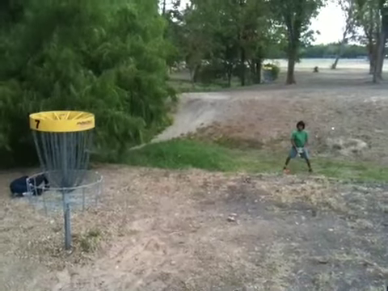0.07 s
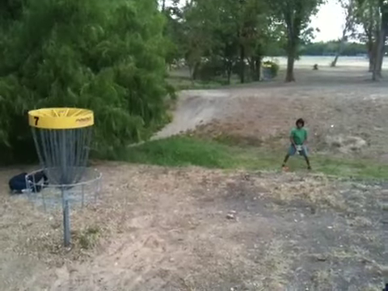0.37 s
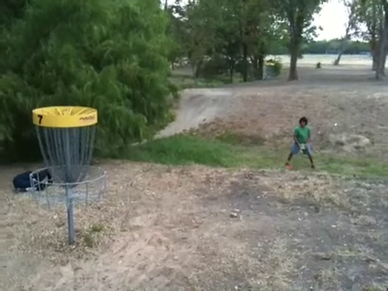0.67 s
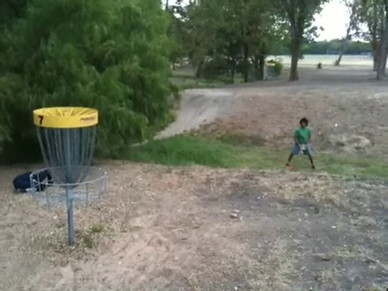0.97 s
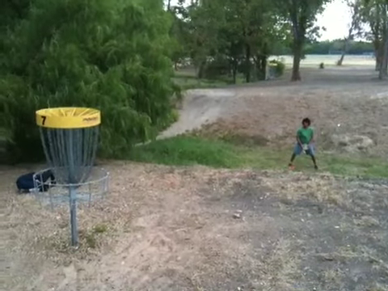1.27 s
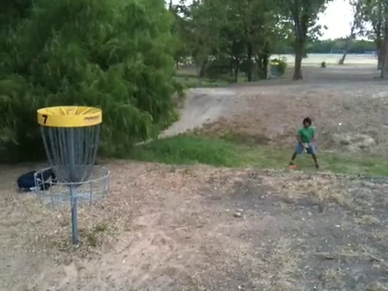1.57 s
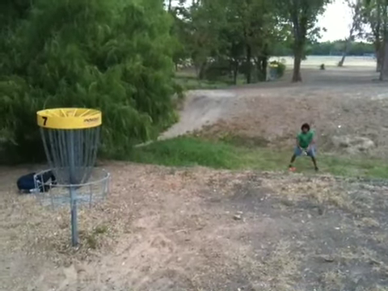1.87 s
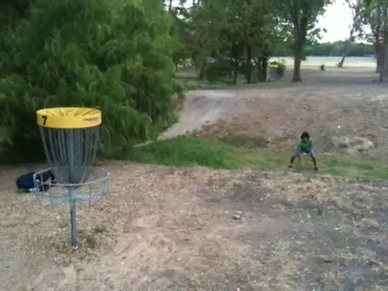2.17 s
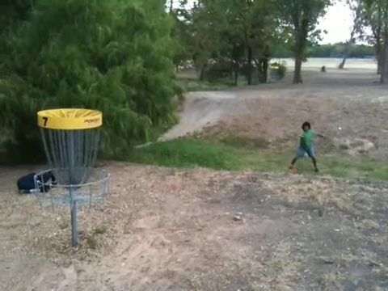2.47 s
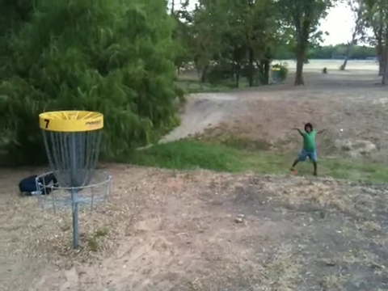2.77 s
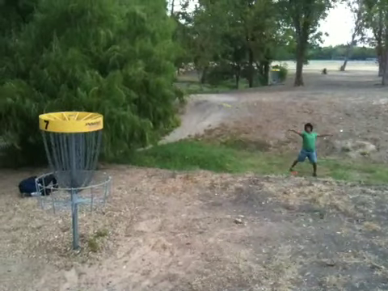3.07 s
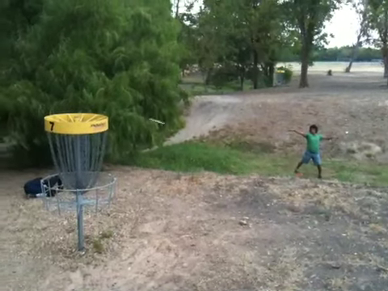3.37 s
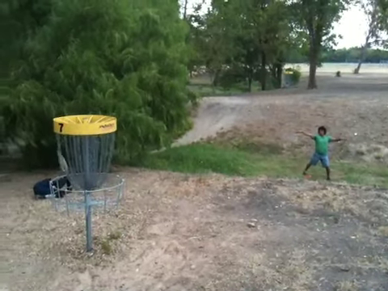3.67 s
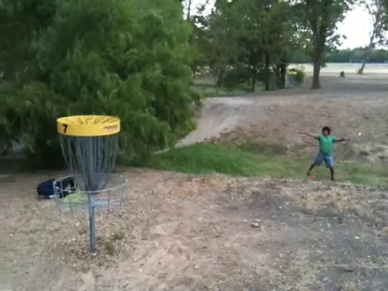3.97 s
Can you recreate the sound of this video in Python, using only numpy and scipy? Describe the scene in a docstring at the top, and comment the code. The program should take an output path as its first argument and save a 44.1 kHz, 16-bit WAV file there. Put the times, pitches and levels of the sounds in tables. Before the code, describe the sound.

A thrown disc crashes into a chain basket near the end. First, outdoor wind rumbles on the microphone for half a second, drops, then returns in uneven gusts from about 1.5 seconds over a faint hush. At 3.7 seconds the plastic knocks into the chains with a loud, bright metallic clatter; the steel basket rings and the swinging links keep jingling until the end, around 4 seconds.

```python
"""Disc into chains, light wind

Outdoors, wind buffets the microphone over a distant hush, a thin whine and two faint whistles.
Near the end a thrown plastic disc slams into the hanging chains of a steel basket:
the plastic knocks, the chains clatter, spokes, frame and rim ring, the swinging links jingle on."""
import sys
import numpy as np
from scipy import signal
from scipy.fft import rfft, irfft
from scipy.io import wavfile
from scipy.ndimage import uniform_filter1d

SR = 44100
rng = np.random.default_rng(int(sys.argv[2]) if len(sys.argv) > 2 else 0)


def to_wav(sig):
    """Store sig (one row per channel, or 1-D mono) as 16-bit WAV at the path in sys.argv[1].

    Samples outside -1..1 are clipped; the rate is SR.
    """
    pcm = np.clip(np.atleast_2d(sig), -1, 1) * 32767
    pcm = np.round(pcm).astype(np.int16)
    wavfile.write(sys.argv[1], SR, pcm.T)  # frames by channels


N = 176400
T = np.arange(N) / SR

# wind strength: time_s, level_db
WIND_CURVE = [(0, -35), (.046, -25), (.075, -22.5), (.135, -31.5), (.18, -26), (.3, -22), (.33, -27),
              (.495, -33), (.53, -48.5), (.78, -52), (1.05, -42.5), (1.28, -55.5), (1.6, -36), (1.655, -41),
              (1.745, -31), (1.91, -45), (2.11, -29.5), (2.3, -40.5), (2.56, -43), (2.76, -37.5),
              (3.0, -35), (3.11, -38.5), (3.22, -32.5), (3.47, -34.5), (3.62, -44), (3.69, -29.5),
              (3.8, -27), (3.86, -43)]
# single buffets: start_s, relative_db
BUFFETS = [(0.204, -15.5), (0.285, -14), (0.59, -29.5), (0.87, -29), (1.177, -25.5), (1.319, -25.5),
           (1.358, -25), (1.564, -23.5), (1.687, -16), (2.029, -21), (2.183, -21.5), (3.021, -17.5),
           (3.157, -20), (3.194, -25.5), (3.25, -21.5), (3.436, -26.5), (3.546, -19)]
# wind rumble: freq_hz, density_db
RUMBLE_SPECTRUM = [(30, -66), (70, -17), (110, -3), (155, 2.5), (240, -4), (350, -13), (550, -27),
                   (1000, -47.5), (2500, -80.5)]
# flutter of strong gusts: freq_hz, density_db
FLUTTER_SPECTRUM = [(150, -32), (260, 2), (400, 6), (620, -2.5), (1500, -28), (2500, -43.5), (5000, -85)]
# still air, far surroundings: freq_hz, density_db
HUSH_SPECTRUM = [(50, -8), (150, 0), (500, 1), (1100, 4.5), (2000, -6), (3000, -9), (4400, -8), (6300, -13)]
# sharpest eddies: centre_s, level_db, pitch_hz, half_width_s
SLAPS = [(0.2922, -41, 464, 0.00098), (0.868, -26, 330, 0.0029), (1.6932, -15.5, 362, 0.0016)]
# rising whistles: start_s, pitch_hz, level_db
WHISTLES = [(2.811, 1840, -75), (2.87, 2420, -76)]
# disc blows on the chains: start_s, level_db, fall_s
BLOWS = [(3.7064, -21, 0.015), (3.723, -14.5, 0.0053), (3.75, -18, 0.013), (3.793, -25.5, 0.018),
         (3.9925, -32.5, 0.018)]
# dry link clatter: freq_hz, density_db
CLATTER_SPECTRUM = [(500, -24), (1200, -10), (2400, -5), (4300, 7), (5400, 6.5), (6600, -1.5), (8200, 7),
                    (10000, 5), (12000, 3), (14200, 9), (15200, -9)]
# plastic knock: freq_hz, density_db
KNOCK_SPECTRUM = [(150, -25), (800, 10), (1100, -1.5), (2400, 4.5), (3500, -22), (7000, -3.5)]
# jostling of the swinging chains: time_s, relative_db
SWING_CURVE = [(3.706, -14), (3.75, 3), (3.82, 0), (3.87, -5.5), (3.93, -9.5), (4.0, -8.5)]
# link modes: pitch_hz, spread_hz
LINK_MODES = [(4080, 150), (8850, 170), (11050, 150), (11600, 90), (11950, 130), (12640, 85), (13540, 120)]
# ring of each link mode: relative_db, t60_s
LINK_RING = [(-21, 0.073), (-19.5, 0.21), (-16, 0.2), (-1, 0.24), (-12, 0.12), (-5.5, 0.075), (-12, 0.15)]
# chain hits on spokes: start_s, level_db, pitch_hz, overtone_db
SPOKE_HITS = [(3.721, -39, 4080, 19.5), (3.7461, -19.5, 4090, 2), (3.763, -18, 3870, -15),
              (3.773, -23.5, 3885, -20), (3.797, -26.5, 3970, -22), (3.851, -30.5, 3912, -29)]
# steel frame modes: pitch_hz, level_db
FRAME_MODES = [(5620, -42), (7994, -52), (9157, -54), (11009, -31), (11714, -21.5), (12678, -37)]
# link-on-link clashes: start_s, level_db
CLASHES = [(3.7245, -19), (3.748, -24), (3.757, -23), (3.771, -12), (3.809, -22), (3.848, -37), (3.86, -22),
           (3.906, -37), (3.9605, -20.5), (3.981, -25), (3.995, -27)]


def from_db(db):
    """Decibels to gain."""
    return 10 ** (np.asarray(db) / 20)


def unit_rms(x):
    """Scale to unit power."""
    return x / np.sqrt(np.mean(x ** 2) + 1e-20)


def gain_curve(rows):
    """Gain along time_s, level_db rows."""
    time_s, level_db = np.transpose(rows)
    return from_db(np.interp(T, time_s, level_db))


def colour(x, spectrum):
    """Shape x by a smooth spectrum; unit power."""
    hz, db = np.transpose(spectrum)
    bins_hz = np.maximum(np.arange(N // 2 + 1) * SR / N, 1)
    gain = from_db(np.interp(np.log(bins_hz), np.log(hz), db))
    return unit_rms(irfft(rfft(x) * gain, N))


def noise(spectrum):
    """Coloured noise; unit power."""
    return colour(rng.standard_normal(N), spectrum)


def drift(corner_hz):
    """Random wander; unit power."""
    bins_hz = np.arange(N // 2 + 1) * SR / N
    return unit_rms(irfft(rfft(rng.standard_normal(N)) / (1 + (bins_hz / corner_hz) ** 2), N))


def steady(x, samples):
    """Even out the level over a sliding window."""
    return x / np.sqrt(np.abs(uniform_filter1d(x ** 2, samples)) + 1e-9)


def swell(start_s, rise_s, fall_s):
    """Linear rise, exponential fall."""
    age_s = np.maximum(T - start_s, 0)
    return np.minimum(age_s / rise_s, 1) * np.exp(-np.maximum(age_s - rise_s, 0) / fall_s)


def contacts(rate_per_s, uneven_db):
    """Random clicks of uneven size."""
    size = from_db(uneven_db * np.minimum(rng.exponential(1, N), 3)) * rng.choice([-1, 1], N)
    return size * (rng.random(N) < rate_per_s / SR)


def ring(clicks, hz, t60_s):
    """Resonator: a unit click starts a decaying unit sine."""
    radius, angle = np.exp(-np.log(1000) / (t60_s * SR)), 2 * np.pi * hz / SR
    return signal.lfilter([0, np.sin(angle)], [1, -2 * radius * np.cos(angle), radius ** 2], clicks + 1e-18)


def ping(start_s, hz, rise_s, t60_s):
    """One mode struck by a brief rattling contact; random phase."""
    out, start = np.zeros(N), min(int(start_s * SR), N - 1)
    age_s = T[:min(N - start, SR // 2)]
    envelope = (1 - np.exp(-age_s / rise_s)) * np.exp(-np.log(1000) * age_s / t60_s)
    out[start:start + len(age_s)] = envelope * np.sin(2 * np.pi * (hz * age_s + rng.random()))
    return out


def puffs(level, rate_per_s=24, fall_s=0.018, steady_above_db=-29.5):
    """Chance puffs roughen weak wind and merge into steady flow as it grows."""
    times_s = np.cumsum(rng.uniform(.35, 1.65, 160)) / rate_per_s
    kicks = np.zeros(N)
    kicks[(times_s[times_s < T[-1]] * SR).astype(int)] = 1
    decays = signal.lfilter([1], [1, -np.exp(-1 / (fall_s * SR))], kicks)
    train = unit_rms(uniform_filter1d(decays, size=130))
    share = 0.6 / (1 + (level / from_db(steady_above_db)) ** 4)
    return level * (1 - share + share * train)


def wind(ceiling_db=-20.5, strong_gust_db=-25, flutter_db=-34):
    """Eddies rumble on the microphone; strong gusts level off and flutter brighter."""
    flow = puffs(gain_curve(WIND_CURVE))
    buffet_power = sum((from_db(db - 7) * swell(start_s, rise_s=0.00258, fall_s=0.025)) ** 2
                       for start_s, db in BUFFETS)
    force = np.sqrt(flow ** 2 + buffet_power)
    rumble_gain = force / np.hypot(1, force / from_db(ceiling_db))
    flutter_gain = from_db(flutter_db) * (force / from_db(strong_gust_db)) ** 2.16
    flutter = steady(noise(FLUTTER_SPECTRUM) * from_db(4.9 * drift(corner_hz=110)), samples=900)
    rumble = steady(noise(RUMBLE_SPECTRUM), samples=1100)
    return rumble_gain * rumble + flutter_gain * flutter


def whine(pitch_hz=4435, waver_hz=10.9, level_db=-79):
    """Thin, steady tone, perhaps a far insect."""
    phase = 2 * np.pi * np.cumsum(pitch_hz + waver_hz * drift(corner_hz=30)) / SR
    return from_db(level_db) * np.sin(phase)


def hush(hush_db=-64, hiss_db=-72.5, hiss_above_hz=12800):
    """Still air and far surroundings; separately, a thin hiss at the very top swells and sinks by chance."""
    highpass = signal.butter(2, hiss_above_hz, "high", fs=SR, output="sos")
    hiss = unit_rms(signal.sosfilt(highpass, rng.standard_normal(N)))
    hiss_gain = from_db(hiss_db) * (1 + np.tanh(drift(corner_hz=5.3)))
    return from_db(hush_db) * noise(HUSH_SPECTRUM) + hiss_gain * hiss


def slaps():
    """The sharpest eddies knock on the microphone for a cycle or two."""
    out = np.zeros(N)
    for centre_s, db, hz, half_width_s in SLAPS:
        offset_s = T - centre_s
        envelope = np.exp(-(offset_s / half_width_s) ** 2)
        out -= from_db(db) * envelope * np.sin(2 * np.pi * hz * offset_s)
    return out


def whistles(length_s=0.135, glide_hz_per_s=1060):
    """Soft, pure rising notes, perhaps a far bird."""
    out = np.zeros(N)
    for start_s, hz, db in WHISTLES:
        age_s = np.clip(T - start_s, 0, length_s)
        phase = 2 * np.pi * (hz + glide_hz_per_s * age_s / 2) * age_s
        out += from_db(db) * np.sin(np.pi * age_s / length_s) * np.sin(phase)
    return out


def clatter(swing, rise_s=0.0032, swing_db=-35.5, knock_db=-26):
    """Blows and swing drive a rush of dry contacts; the first blow also knocks the disc's plastic."""
    blow_power = sum((from_db(db) * swell(start_s, rise_s, fall_s)) ** 2 for start_s, db, fall_s in BLOWS)
    rush = np.sqrt(blow_power + (from_db(swing_db) * swing) ** 2)
    knock = from_db(knock_db) * swell(BLOWS[0][0], rise_s, fall_s=0.0094)
    steel = colour(contacts(rate_per_s=11000, uneven_db=2.5), CLATTER_SPECTRUM)
    plastic = colour(contacts(rate_per_s=5500, uneven_db=7.5), KNOCK_SPECTRUM)
    return rush * steady(steel, samples=300) + knock * steady(plastic, samples=500)


def wires(hits, modes=80, low_hz=1172, high_hz=13120, t60_s=0.15):
    """The hits plus the ring of many thin wires and links after each contact."""
    age_s = T[:N // 10]
    hz = low_hz + (high_hz - low_hz) * (np.arange(modes) + rng.random(modes)) / modes
    tail = rng.standard_normal(modes) @ np.sin(2 * np.pi * hz[:, None] * age_s)
    tail *= np.exp(-np.log(1000) * age_s / t60_s)
    tail /= np.sqrt(2 * np.sum(tail ** 2))
    return hits + from_db(-4.5) * signal.fftconvolve(hits, tail)[:N]


def jingle(swing, links=8, gain_db=-23):
    """Jostling contacts fall on slightly different links, each ringing in its own modes."""
    clicks = contacts(rate_per_s=650, uneven_db=1.5)
    struck_link = rng.integers(0, links, N)
    out = np.zeros(N)
    for (hz, spread_hz), (db, t60_s) in zip(LINK_MODES, LINK_RING):
        pitches_hz = hz + spread_hz * (np.linspace(-1.5, 1.5, links) + rng.uniform(-.1, .1, links))
        mode = sum(ring(clicks * (struck_link == k), pitches_hz[k], t60_s) for k in range(links))
        out += from_db(db) * steady(mode, samples=3500)
    return from_db(gain_db) * swing * out


def spokes(twin_offset_hz=59, twin_db=-1, overtone_ratio=2.16):
    """Chains whip steel spokes; each rings with a beating mode pair and one overtone."""
    out = np.zeros(N)
    for start_s, db, hz, overtone_db in SPOKE_HITS:
        modes = (hz, 0), (hz + twin_offset_hz, twin_db), (hz * overtone_ratio, overtone_db)
        for mode_hz, mode_db in modes:
            out += from_db(db + mode_db) * ping(start_s, mode_hz, rise_s=0.00063, t60_s=0.13)
    return out


def frame(start_s=3.722):
    """The disc sets the steel frame ringing past the clatter; two random-phase pings per mode."""
    return sum(from_db(db) * ping(start_s, hz, rise_s=0.007, t60_s=0.49)
               for _ in range(2) for hz, db in FRAME_MODES)


def clashes():
    """Two links meet hard, soon damped by their neighbours."""
    out = np.zeros(N)
    for start_s, db in CLASHES:
        for (hz, spread_hz), (mode_db, _) in zip(LINK_MODES, LINK_RING):
            for link_hz in hz + spread_hz * rng.standard_normal(2):
                out += from_db(db + mode_db) * ping(start_s, link_hz, rise_s=0.00041, t60_s=0.048)
    return out


def rim(level_db=-31):
    """The basket's rim sings one lingering note after the hardest hit."""
    return from_db(level_db) * ping(start_s=3.762, hz=3920, rise_s=0.00063, t60_s=0.85)


def scene():
    """Wind and hush throughout, then the disc lands in the chains; mono."""
    swing = gain_curve(SWING_CURVE) * (T > BLOWS[0][0])
    chains = wires(clatter(swing)) + jingle(swing) + clashes()
    basket = spokes() + rim() + frame()
    outdoors = wind() + slaps() + whine() + hush() + whistles()
    return (outdoors + chains + basket)[None]


def record(dry, low_cut_hz=78, high_cut_hz=15400):
    """Small microphone: deep bass dropped, top cut steeply."""
    highpass = signal.butter(2, low_cut_hz, "high", fs=SR, output="sos")
    lowpass = signal.ellip(10, .1, 80, high_cut_hz, fs=SR, output="sos")
    return signal.sosfilt(lowpass, signal.sosfilt(highpass, dry))


dry = scene()
out = record(dry)
to_wav(out)
```